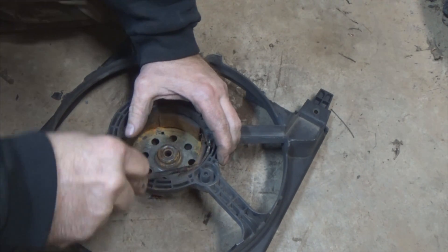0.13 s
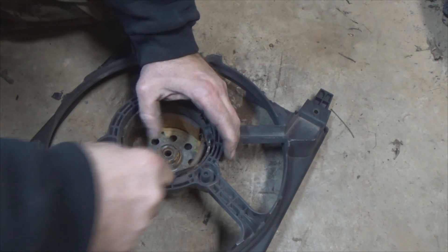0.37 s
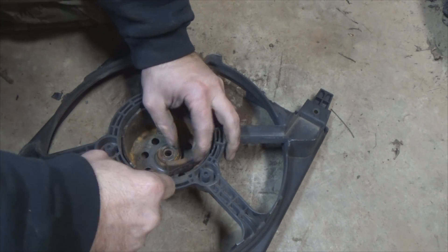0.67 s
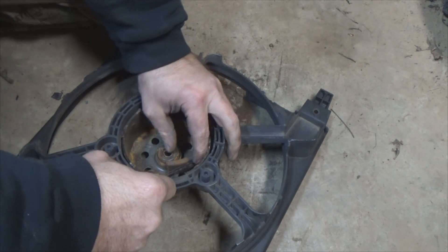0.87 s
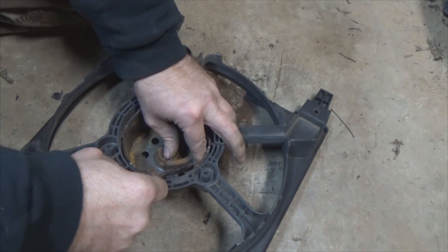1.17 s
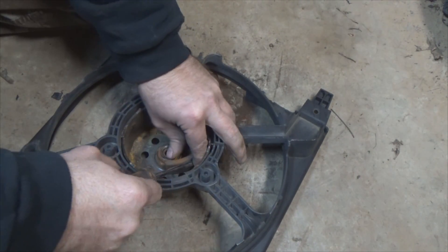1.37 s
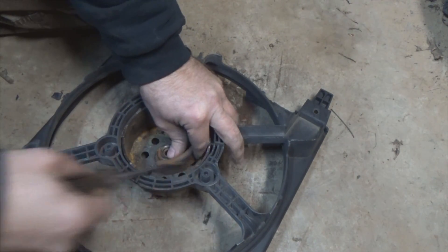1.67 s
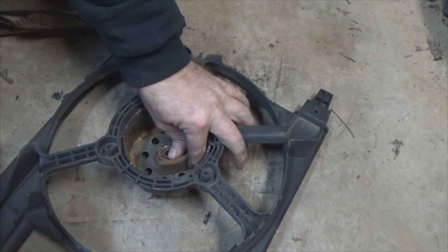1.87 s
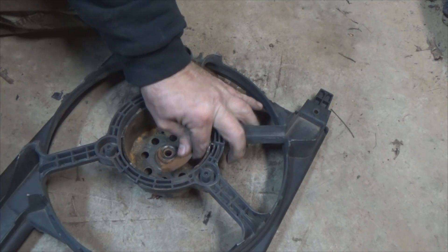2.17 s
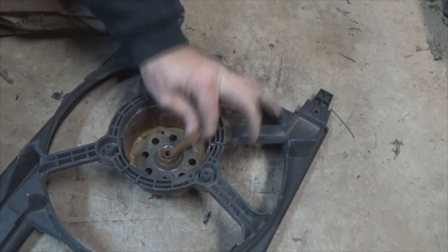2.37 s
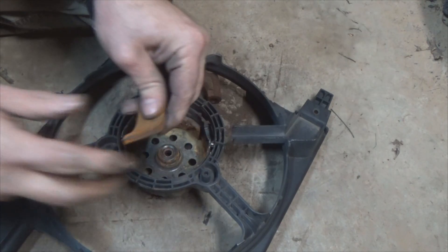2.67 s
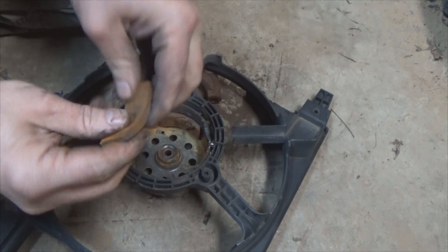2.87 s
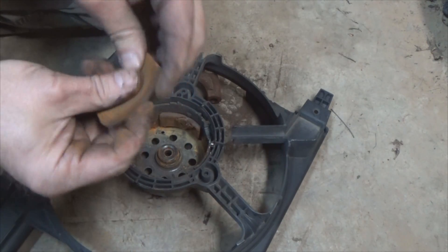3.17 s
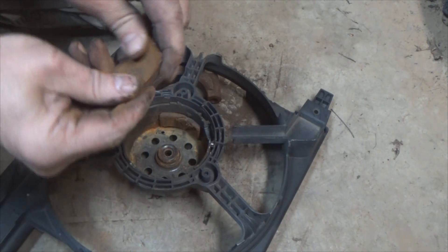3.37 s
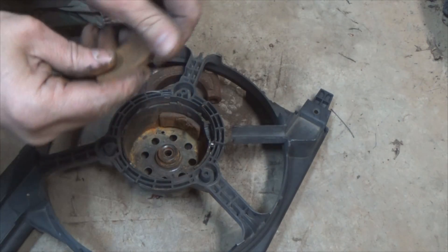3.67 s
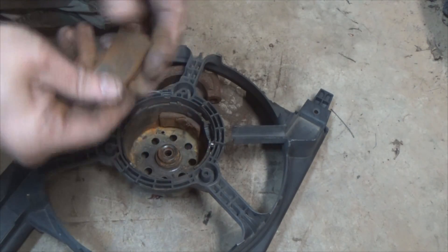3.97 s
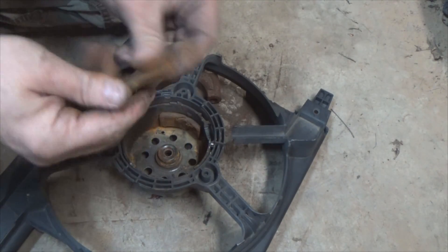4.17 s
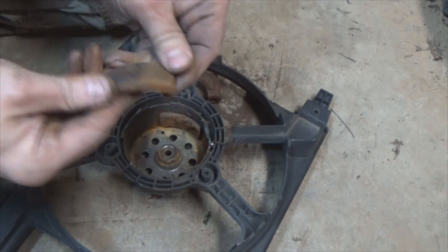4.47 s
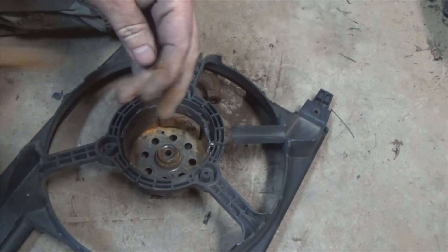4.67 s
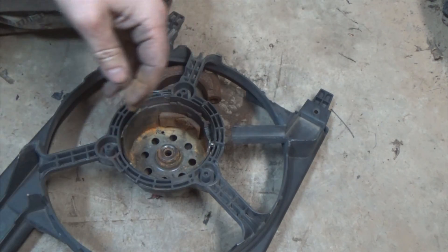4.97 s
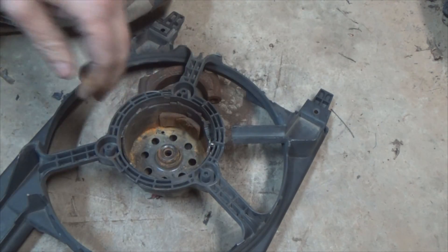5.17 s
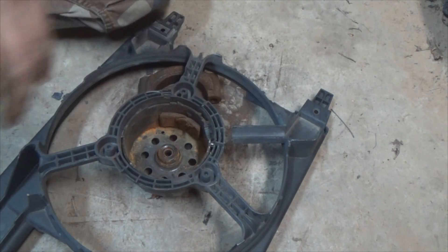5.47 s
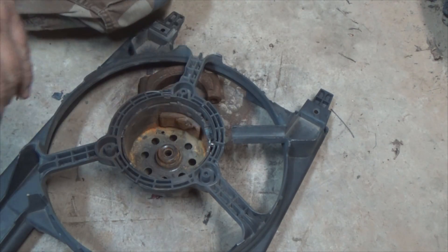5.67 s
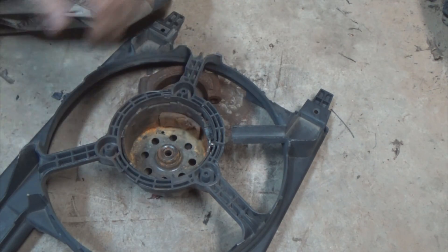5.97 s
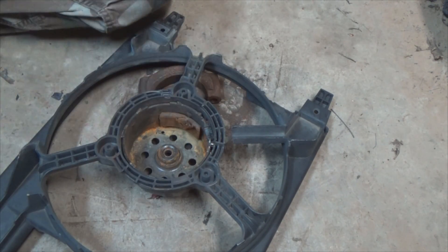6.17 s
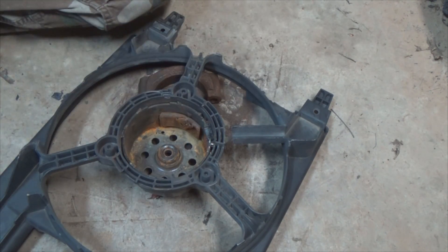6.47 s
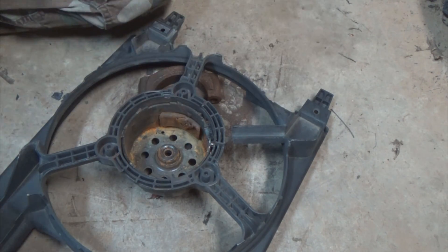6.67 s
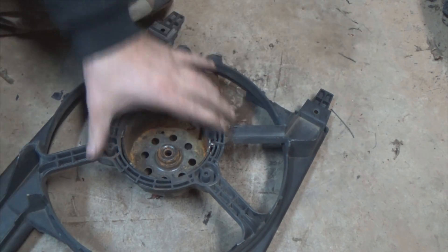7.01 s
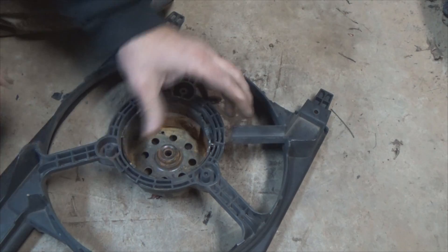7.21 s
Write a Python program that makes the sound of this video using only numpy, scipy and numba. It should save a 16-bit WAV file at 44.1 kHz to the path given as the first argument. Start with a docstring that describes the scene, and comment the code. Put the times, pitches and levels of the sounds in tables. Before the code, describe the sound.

Close up in a small workshop, a thin steel tool clatters and grates in a rusty motor shell, with short squeaks. A loosened magnet clacks free, dry fingertips hiss over it, a hand swishes on cloth, then the thrown magnet smashes noisily into a steel locker. Its panels ring on briefly over faint room hum, ending with light plastic taps.

```python
"""A thin steel tool pries a fastener and curved magnets from a motor shell in a plastic fan frame.
Each click is a burst of noise plus ringing modes; scrapes are rough noise through shell modes, squeals are overtones.
Magnets clack, and a thrown one crashes into a steel locker: fading noise bands and lone tones that ring on.
Dry fingers and a hand on trousers are shaped hiss. A small workshop adds echo, room tone, hum and a camera whine.
A close microphone with a fast limiter hears it all."""
import sys
import numpy as np
from scipy import signal
from scipy.fft import rfft, irfft
from scipy.io import wavfile
from scipy.ndimage import map_coordinates
from numba import njit

SR = 44100
rng = np.random.default_rng(int(sys.argv[2]) if len(sys.argv) > 2 else 0)


def waveform_to_disk(signal):
    """Save audio, clipped to [-1, 1], as 16-bit WAV at the path in sys.argv[1]."""
    frames = np.transpose(np.atleast_2d(signal))
    scaled = np.clip(frames, -1, 1) * 32767
    samples = np.round(scaled).astype(np.int16)
    wavfile.write(sys.argv[1], SR, samples)


N = 323865
TIME = np.arange(N) / SR
THIRDS_HZ = 50 * 2 ** (np.arange(26) / 3)

# Edges of the five bands of a contact (thud, body, clank, edge, sizzle): edge_hz
BAND_EDGES_HZ = [175, 600, 1700, 3000, 7000, 13500]
# Blows, with levels before each layer's gain:
# start_s, level_db, brightness_db_per_octave, clank_db (of a square hit), contact_decay_ms
TOOL_CLICKS = [(0.035, -8, -3.5, 9, 4.4), (0.054, -12.5, -2.5, 12, 1.4), (0.072, -12.5, -5.0, 9, 2.5),
               (0.135, -10, 1.5, 15, 1.5), (0.233, -29, 1.5, 0, 1.5), (0.246, -33, 1.5, -10.5, 1.8),
               (0.265, -17, 1, -4.5, 1.1), (0.274, -23.5, 2.0, 2, 0.76), (0.286, -35, 4.5, -10, 3.8),
               (0.474, -19, 1.5, -5, 0.61), (0.479, -20.5, 2.5, 2, 1.0), (0.532, -21, -2, -3.0, 1.6),
               (0.539, -22, 1.5, 9.0, 1.8), (0.545, -15.5, 0.5, 18, 1.7), (0.579, -25, 0, 19, 2.9),
               (0.697, -30.5, 1, -17, 3.7), (0.711, -21, -4.5, -24, 2.6), (1.342, -47.5, 3, -21, 1.8),
               (1.397, -45.5, 1.5, 9, 5.6), (1.434, -46.5, -0.5, 12.5, 11), (1.487, -35.5, -2.5, -11, 1.8),
               (1.647, -33, -1.5, -1, 4.8), (1.858, -19, 1.5, 8, 3.3), (2.008, -37.5, -4, 5, 6),
               (2.088, -25, -1, -12, 6.1), (2.431, -26, -1, -14, 3.4), (2.479, -18, 1, -7, 4.4)]
SHELL_KNOCKS = [(0.009, -11.5, 0.5, -11.5, 5.9), (0.456, -29, -0.5, -10, 15), (0.467, -21.5, -1.5, 2, 1.1),
                (0.562, -39.5, 6, 15, 2.4), (0.646, -23, -1.0, -11.0, 4.5), (0.661, -31, -6.5, 1, 3.3),
                (0.806, -41.5, 1, -0.5, 3.0), (1.156, -39.5, 0, -4, 7.2), (1.198, -46, -5, -4, 6),
                (1.691, -33.5, -2.0, -9, 3.3), (2.138, -24.5, 2.5, 3.5, 8.1), (2.144, -24.5, -2.0, 6, 3.3),
                (2.178, -35, 0.5, -6, 2.3), (2.221, -46.5, 6, 2, 3.3), (2.283, -24.5, 9.5, 15, 4.5)]
MAGNET_CLACKS = [(2.602, -36, -10, 17, 1), (2.754, -17.5, 4, -6, 2.3), (2.787, -28, 6.5, 8.5, 2.5),
                 (2.807, -30.0, 1, -12.0, 4.7), (2.956, -15, 1, -4.5, 2.1), (4.862, -45.5, -2.5, -2.0, 1.2),
                 (4.996, -51, -2, 4, 1)]
FRAME_BUMPS = [(0.833, -50, -6.0, -17, 19), (0.85, -44.5, 1, -16, 34), (0.897, -46.5, 0.5, -4.0, 28),
               (1.549, -42.5, -1.5, 4, 4.2), (2.598, -40, -4, 3, 0.52), (2.75, -44, -3.5, -23, 9.6),
               (2.836, -45.5, -1.5, -25, 7), (2.938, -50, -3.5, -12, 2.4), (2.992, -40, -0.5, 17, 0.73),
               (3.011, -40.5, -1, 6, 0.55), (7.178, -33.5, 2.5, 15.5, 1.3), (7.2, -49, 5.5, 10, 5.4),
               (7.235, -42.5, 2, -4.5, 9.3)]
# Strokes over rusty steel, before the layer's gain:
# start_s, end_s, level_db, brightness_db_per_octave, swell_db (from start to end)
SCRAPES = [(0.009, 0.072, -25, -3.5, 6.0), (0.066, 0.139, -24.5, -4, -6.5), (0.139, 0.224, -37.5, 0.5, -18),
           (0.487, 0.513, -36, -1.5, 8), (0.516, 0.536, -26, 1, 20), (0.558, 0.614, -29, -1.5, -10.5),
           (0.612, 0.661, -34.5, -2.5, 15), (0.677, 0.726, -44.5, -1, -1.5), (1.622, 1.687, -45, 1.5, 18),
           (1.71, 1.777, -37.0, 0.0, 20.5), (1.789, 1.817, -29.5, 2.5, 8), (1.824, 1.857, -37.5, -1, 3),
           (1.871, 1.942, -35.5, 0, -20), (2.072, 2.084, -45.5, 0.5, 15), (2.124, 2.136, -39, 2.5, 37),
           (2.162, 2.217, -55, 1, 4), (2.226, 2.277, -44, 0.5, 12), (2.295, 2.327, -32, 1.0, -7.5),
           (2.332, 2.386, -41, 1.5, -11), (2.379, 2.437, -42, 6.5, 1), (2.435, 2.481, -40.5, 1.0, 18)]
# Stick-slip locking into a tone:
# start_s, end_s, first_pitch_hz, last_pitch_hz, level_db, slope_db_per_overtone, pitch_jitter_share
SQUEALS = [(0.142, 0.187, 5800, 6920, -28.5, -20, 0.067), (0.867, 0.901, 287, 235, -48.5, -19, 0.038),
           (1.779, 1.815, 4780, 4610, -25, -9, 0.038), (1.808, 1.82, 8800, 8600, -27, -20, .01),
           (1.816, 1.827, 6780, 6480, -28, -15, .01), (2.125, 2.13, 2400, 2330, -34, 0, 0.018),
           (2.188, 2.28, 5870, 6030, -57, -20, .012), (2.293, 2.328, 2280, 2264, -30, 0.5, 0.057),
           (2.378, 2.398, 2143, 2190, -33.5, -2, 0.0081), (2.391, 2.432, 2081, 2010, -22.5, 1, 0.011),
           (2.43, 2.438, 2210, 2330, -21, 3, 0.011), (2.558, 2.576, 2200, 2150, -47.5, -17, .01),
           (7.227, 7.25, 850, 680, -48, -14, .04)]
# What each thing rings with, before small random shifts and band balancing: pitch_hz, width_hz, level_db
TOOL_MODES = [(5964, 196, 6.5), (6620, 110, -9), (7300, 50, -9.5), (8180, 220, 8), (8950, 120, 2),
              (9660, 190, 5.5), (10450, 71, -3), (12300, 33, -18)]
SHELL_MODES = [(865, 41, -4), (1130, 126, 2), (1487, 90, -2), (2062, 130, 4.5), (2365, 79, 0),
               (2590, 180, -3), (5010, 48, -14), (5580, 48, -24), (5650, 210, -0.5), (6590, 350, -4),
               (7600, 180, -12), (7630, 160, -7.5), (8620, 200, -4), (8690, 115, -1), (9485, 120, 2)]
MAGNET_MODES = [(2080, 100, 8.5), (3800, 140, -8.5), (5880, 180, -1.5), (6200, 220, -16), (6900, 240, -13),
                (7700, 97, -10), (8940, 75, -7)]
FRAME_MODES = [(337, 76, 0.5), (795, 19, -11.5), (885, 53, -1.5), (1174, 120, 9.5), (1610, 130, 7),
               (2086, 130, -4), (4450, 110, -11.5)]
# Usual colour of a contact on each thing: level_db in each of the five bands
TOOL_COLOUR = [-26, -18.5, -18.5, -5, 0.5]
SHELL_COLOUR = [-17, -2.5, 1.5, -3, -8.5]
MAGNET_COLOUR = [-25.5, -12.5, -5.5, -0.5, -19]
FRAME_COLOUR = [-4, 0, -13, -12, -11]
RUST_COLOUR = [-17, -5.5, -3.5, 0, 0.5]
# Magnet and its pieces hitting the locker: start_s, level_db, emphasised_hz, emphasis_db
LOCKER_BLOWS = [(5.815, -3.5, 1300, 3), (5.824, -5, 4530, 13), (5.845, 4, 4460, 6), (5.879, 5, 11400, 11.5),
                (5.923, 2.5, 387, 8), (5.948, -8.5, 1500, -14)]
# Dense modes of the sheet steel: band_hz, level_db (per third octave), fade_by_60_db_s
LOCKER_SHEET = [(60, -80, 1.6), (113, -51, 2), (226, -53, 1.97), (480, -44.5, 1.07), (885, -37, 0.78),
                (2080, -29, 0.43), (4020, -28, 0.28), (6650, -27, 0.23), (9500, -24.5, 0.22),
                (12500, -39, 0.19), (16000, -59, 0.14)]
# Lone panel modes, before their shared gain: pitch_hz, level_db, fade_by_60_db_s
LOCKER_MODES = [(120, -54, 1.2), (165.4, -44, 1.8), (217, -32, 1.57), (278, -36, 0.8), (357.7, -42, 5.3),
                (400, -40.5, 1.74), (588, -16.5, 0.29), (681, -20.5, 0.4), (862, -51, 2.67),
                (869, -15.5, 0.26), (1023, -45, 1.4), (1250, -53, 0.7), (1400, -36.5, 0.96),
                (1424, -43, 0.78), (1670, -51, 1.51), (1920, -40.5, 0.93)]
# Dry fingertips sliding over magnet and steel, before the gains: fastest_s, level_db, rise_s, fall_s
FINGER_SLIDES = [(1.02, -58.5, .04, 0.044), (1.13, -53, 0.049, 0.045), (1.25, -54.5, 0.048, 0.074),
                 (1.47, -60, 0.07, .08), (1.98, -51.5, 0.044, 0.11), (2.645, -55, .02, 0.029),
                 (2.8, -43.5, 0.058, 0.21), (3.02, -50, 0.07, 0.18), (3.21, -39.5, 0.07, .015),
                 (3.3, -38, 0.046, 0.058), (3.43, -41.5, 0.087, 0.18), (3.7, -37, 0.04, 0.042),
                 (3.78, -36, 0.039, 0.053), (3.962, -32.5, 0.033, .02), (4.09, -45, 0.077, 0.21),
                 (4.378, -36, 0.015, 0.027), (4.43, -46, .04, 0.065), (4.62, -44, 0.093, 0.12),
                 (4.73, -38.5, 0.034, 0.011), (5.1, -65.5, 0.63, 0.58)]
# Hand and sleeve brushing over cloth, before the gain: fastest_s, level_db, rise_s, fall_s
CLOTH_BRUSHES = [(5.465, -54, 0.011, 0.036), (5.537, -48, 0.016, 0.027), (6.47, -46, 0.12, 0.11),
                 (6.615, -43, 0.096, 0.038), (6.96, -62.5, 0.14, .13), (7.165, -49, 0.013, 0.012)]
# Relative spectra of the two finger hisses, the cloth and the room: pitch_hz, level_db (per Hz)
SKIN_HIGH = [(4000, -28.5), (6500, -11), (8000, -4.5), (9700, 1), (11500, -10), (13500, -16), (16000, -23)]
SKIN_LOW = [(300, -33), (1000, -9), (2800, -8.5), (4500, 3), (6500, 0.5), (8500, -19), (12000, -39)]
CLOTH_TONE = [(880, -46), (1500, -6), (1540, -21.5), (1670, -13), (2230, -11), (4210, -6), (5780, -8.5),
              (8250, -1), (15000, -19)]
FLOOR_TONE = [(12, -50), (20, -8), (86, -4.5), (116, -6), (150, -14.5), (177, -4.5), (210, -14),
              (377, -16.5), (1120, -19), (1330, -17), (2260, -23), (2460, -22), (3070, -26), (4060, -26.5),
              (16000, -34)]
# Workshop echo, before the wet gain: band_hz, level_db (per third octave), fade_by_60_db_s
ROOM = [(150, -26, 0.44), (504, -26.5, 0.11), (1520, -24, 0.22), (4050, -30, 0.19), (8050, -28.5, 0.19),
        (14000, -57, 0.29)]
# Wavering hum: pitch_hz, level_db (middle of its waver)
HUM = [(116, -60.5), (1310, -69)]


def tool_clicks():
    """The thin steel tool rings high and briefly when it hits."""
    return blows(TOOL_CLICKS, TOOL_MODES, TOOL_COLOUR,
                 attack_s=0.00059, ring_db=-5.5, tail_db=-32, tail_s=0.031, gain_db=-6)


def shell_knocks():
    """The motor shell rings lower, with a longer faint rattle."""
    return blows(SHELL_KNOCKS, SHELL_MODES, SHELL_COLOUR,
                 attack_s=0.00068, ring_db=-4, tail_db=-29.5, tail_s=0.13, gain_db=-4)


def scrapes(slip_rate, spread_db, ring_db, edge_s, fade_s, gain_db):
    """Irregular slips of the tool over rust drive the modes of the shell, which wander as the tip moves."""
    out = np.zeros(N)
    for start, end, level_db, brightness_db, swell_db in SCRAPES:
        length = max(end - start, edge_s)
        t = TIME[:int((length + .06) * SR)]
        onset = np.minimum(t / edge_s, 1)
        swell = amp(swell_db * np.minimum(t / length, 1))
        release = np.exp(-np.maximum(t - length, 0) / fade_s)
        slips = grit(slip_rate, spread_db, size=SR // 2)[:len(t)] * onset * swell * release
        body = signal.fftconvolve(slips, ring(SHELL_MODES))[:len(t)]
        # Reading the ring slightly early or late makes its pitch wander
        drift_s = np.cumsum(.015 * walk(50, size=SR // 2)[:len(t)]) / SR
        body = map_coordinates(body, [(t + drift_s) * SR], order=3)
        scrape = unit(slips) + amp(ring_db) * unit(body)
        add(out, start, weigh(scrape, RUST_COLOUR, level_db, brightness_db, 0, size=int(length * SR)))
    return out * amp(gain_db)


def squeals(flutter_db, rough_jitter, edge_s):
    """The slips turn periodic: a stack of overtones whose level flutters more when the pitch is rougher."""
    out = np.zeros(N)
    for start, end, first_hz, last_hz, level_db, slope_db, jitter in SQUEALS:
        t = TIME[:int(max(end - start, edge_s) * SR)]
        waver, flutter = (walk(rate, size=SR // 4)[:len(t)] for rate in (900, 400))
        hz = np.linspace(first_hz, last_hz, len(t)) * (1 + jitter * waver)
        phase = 2 * np.pi * np.cumsum(hz) / SR
        tone = sum(amp(slope_db * k) * np.sin(k * phase + k * k)
                   for k in range(1, 6) if k * first_hz < 11000)
        roughness = min(abs(jitter) / rough_jitter, 1)
        edges = np.minimum(np.minimum(t, t[::-1]) / edge_s, 1)
        add(out, start, amp(level_db) * unit(tone * amp(flutter_db * roughness * flutter) * edges))
    return out


def magnet_clacks():
    """The magnets ring clearly after a very sharp contact."""
    return blows(MAGNET_CLACKS, MAGNET_MODES, MAGNET_COLOUR,
                 attack_s=.00015, ring_db=0.5, tail_db=-26, tail_s=0.022, gain_db=-5.5)


def locker(side_db, pan_db, build_cycles, emphasis_octaves, modes_db, ring_start, ring_end, end_s):
    """Blows set the thin panels shimmering; low bands build slowly, and lone panel modes ring on."""
    t = TIME[:2 * SR]
    start = LOCKER_BLOWS[0][0]
    crash = np.zeros((2, len(t)))
    for hz, noise in zip(THIRDS_HZ, diffuse(len(t))):
        sheet_db, t60 = at_hz(hz, LOCKER_SHEET)
        power = np.zeros(len(t))
        for s, blow_db, peak_hz, peak_db in LOCKER_BLOWS:
            age = np.maximum(t - (s - start), 0)
            emphasis_db = peak_db * np.exp(-(np.log2(hz / peak_hz) / emphasis_octaves) ** 2)
            build = 1 - np.exp(-age * hz / build_cycles)
            power += (amp(sheet_db + blow_db + emphasis_db - 60 * age / t60) * build) ** 2
        # Each group of modes beats on its own
        crash += noise * np.sqrt(power) * amp(0.82 * walk(150, size=len(t)))
    crash *= amp(0.26 * walk(450, size=len(t)))  # the loose door chatters
    panels = sum(amp(db + modes_db - 60 * t / t60) * np.sin(2 * np.pi * (hz * t + rng.random((2, 1))))
                 for hz, db, t60 in LOCKER_MODES)
    out = np.zeros((2, N))
    add(out, start, crash)
    add(out, ring_start, panels * (1 - np.exp(-t / 0.08)))
    out = out * np.exp(-np.maximum(TIME - ring_end, 0) / end_s)  # the last of the ring dies away quickly
    # Left and right differ mainly between the bass and the top
    mid, side = out[0], amp(side_db) * band(out[1], 490, 9200)
    return place(np.array([mid + side, mid - side]), pan_db)


def fingers(high_db, low_db):
    """Fine-grained hiss of dry fingertips sliding on the parts; louder slides are brighter."""
    high = colour(grit(830, 1.6), SKIN_HIGH)
    low = colour(grit(700, 1.7), SKIN_LOW)
    gain = strokes(FINGER_SLIDES)
    # Above this level the lower hiss grows only 0.69 dB per dB of the upper one
    even = amp(-57)
    lower_gain = np.minimum(gain, even * (gain / even) ** 0.69)
    hiss = amp(high_db) * gain * high + amp(low_db) * lower_gain * low
    return hiss * amp(1.37 * walk(60))


def cloth(gain_db):
    """Soft swishes of hand and sleeve on trousers: shaped noise that swells and fades."""
    return amp(gain_db) * strokes(CLOTH_BRUSHES) * colour(grit(240, 0.86), CLOTH_TONE)


def frame_bumps():
    """The plastic frame answers a touch with low, damped modes."""
    return blows(FRAME_BUMPS, FRAME_MODES, FRAME_COLOUR,
                 attack_s=0.00045, ring_db=-4.5, tail_db=-20.5, tail_s=0.028, gain_db=-2.5)


def workshop(x, wet_db, side_db, gap_s):
    """Short diffuse echo of floor, walls and shelves: noise bands that fade at their own speeds."""
    t = TIME[:SR // 2]
    response = 0
    for hz, noise in zip(THIRDS_HZ, diffuse(len(t))):
        level_db, t60 = at_hz(hz, ROOM)
        tail = noise * amp(-60 * t / t60) * np.clip(t / gap_s - 1, 0, 1)
        # The last factor makes up for the greater width of higher bands
        response = response + amp(level_db) * unit(tail) / np.sqrt(len(t)) * np.sqrt(hz / 1000)
    echo = signal.fftconvolve(x[None], response, axes=1)[:, :N]
    mid, side = echo * amp([[wet_db], [wet_db + side_db]])
    return np.array([mid + side, mid - side])


def camera_whine(hz, peak_db, pip_s):
    """The camera gives off a faint, uneven pip once every picture."""
    pictures_per_s = 29.97
    offset = ((TIME - 5.757) * pictures_per_s + .5) % 1 - .5  # in pictures, from the nearest pip
    pips = np.exp(-(offset / pictures_per_s / pip_s) ** 2) * amp(peak_db + 2 * walk(30))
    return pips * np.sin(2 * np.pi * hz * TIME + walk(200))


def room_tone(floor_db, side_db):
    """Rumble and hiss from shaped noise, and a hum that wavers in level and phase."""
    mid, side = (colour(rng.standard_normal(N), FLOOR_TONE) for _ in range(2))
    side = amp(side_db) * band(side, 270, 9900)
    hum = sum(amp(db + 1.8 * walk(5.0)) * np.sin(2 * np.pi * hz * TIME + 2.3 * walk(8.9)) for hz, db in HUM)
    return amp(floor_db) * np.array([mid + side, mid - side]) + hum


def blows(table, modes, tone_db, attack_s, ring_db, tail_db, tail_s, gain_db):
    """Each blow is a brief crack, the modes of the struck body and a faint rattle of what touches it."""
    out = np.zeros(N)
    for start, level_db, brightness_db, clank_db, contact_ms in table:
        body = ring(modes)
        t = TIME[:len(body)]
        envelope = np.exp(-1000 * t / contact_ms) + amp(tail_db) * np.exp(-t / tail_s)
        noise = envelope * rng.standard_normal(len(t))
        hit = (noise + amp(ring_db) * body) * (1 - np.exp(-t / attack_s))
        add(out, start, weigh(hit, tone_db, level_db, brightness_db, clank_db, size=265))
    return out * amp(gain_db)


def ring(modes, size=6000):
    """Free decay of a struck body; contact point and grip change each mode's strength and shift it a little."""
    shift, spread_db = .01, 3
    t = TIME[:size]
    out = 0
    for hz, width, db in modes:
        detune, phase, strength = rng.standard_normal(3)
        decay = np.exp(-np.pi * abs(width) * t)
        tone = np.sin(2 * np.pi * (hz * (1 + shift * detune) * t + phase))
        out = out + amp(db + spread_db * strength) * decay * tone
    return out


def weigh(x, tone_db, level_db, brightness_db, clank_db, size):
    """Set a contact's level and colour by its first samples: hardness tilts it, a square hit adds clank."""
    # A contact of finite length holds little top
    x = signal.sosfilt(signal.butter(2, 12500, fs=SR, output="sos"), x)
    pivot_hz, clank_hz, clank_octaves = 2000, 2200, 2.23
    out = 0
    for lo, hi, db in zip(BAND_EDGES_HZ, BAND_EDGES_HZ[1:], tone_db):
        part, hz = band(x, lo, hi), np.sqrt(lo * hi)
        tilt = brightness_db * np.log2(hz / pivot_hz)
        clank = clank_db * max(1 - abs(np.log2(hz / clank_hz)) / clank_octaves, 0)
        out = out + part * amp(level_db + db + tilt + clank) / np.std(part[:size])
    return out


def strokes(table):
    """Level of rubbing movements: each speeds up to a peak and slows down again along a bell curve."""
    power = 1e-18
    for peak_s, level_db, rise_s, fall_s in table:
        width_s = np.where(TIME < peak_s, rise_s, fall_s)
        power = power + amp(level_db) ** 2 * np.exp(-((TIME - peak_s) / width_s) ** 2 * 2)
    return np.sqrt(power)


def walk(rate, size=N):
    """Smooth chance with a spread near 1, taking a new random value rate times a second."""
    points = rng.standard_normal(size)
    return np.interp(np.arange(size) / SR * rate, np.arange(size), points) * np.sqrt(1.5)


def grit(rate, spread_db, size=N):
    """Noise broken up by tiny bumps of uneven size."""
    return unit(rng.standard_normal(size) * amp(spread_db * walk(rate, size)))


def diffuse(size):
    """Third-octave bands of noise, each with rms 1, different left and right: bands x 2 x samples."""
    noise = rng.standard_normal((2, size))
    return np.array([unit(band(noise, hz / 2 ** (1 / 6), hz * 2 ** (1 / 6))) for hz in THIRDS_HZ])


def colour(x, spectrum):
    """Give a signal a spectrum; rms 1."""
    gain_db = at_hz(np.fft.rfftfreq(N, 1 / SR), spectrum)[0]
    return unit(irfft(rfft(x) * amp(gain_db), N))


def at_hz(hz, table):
    """Read the columns of a table on a log-frequency axis."""
    points, *columns = np.transpose(table)
    return [np.interp(np.log(hz + 1e-9), np.log(points), c) for c in columns]


def band(x, lo_hz, hi_hz):
    """Keep only the sound between two frequencies."""
    return signal.sosfilt(signal.butter(4, [lo_hz, min(hi_hz, SR / 2 - 1)], "band", fs=SR, output="sos"), x)


def amp(db):
    """Decibels to gain."""
    return 10 ** (np.asarray(db) / 20)


def unit(x):
    """Scale to rms 1."""
    return x / np.sqrt(np.mean(x ** 2) + 1e-20)


def add(track, start, sound):
    """Mix a sound into a track at a time in seconds."""
    i = max(int(start * SR), 0)
    track[..., i:i + sound.shape[-1]] += sound[..., :N - i]


def place(x, pan_db):
    """Set a sound between left and right by their level difference; above zero is left."""
    return x * amp(np.array([[pan_db], [-pan_db]]) / 2)


def scene():
    """Handwork near the centre and magnets to the left, both with echo; then the locker and background."""
    work = tool_clicks() + shell_knocks() + frame_bumps()
    work += scrapes(slip_rate=469, spread_db=1.5, ring_db=6.5, edge_s=0.0029, fade_s=0.0099, gain_db=-2.5)
    work += squeals(flutter_db=2.5, rough_jitter=.035, edge_s=0.0013)
    work += fingers(high_db=0.5, low_db=-3.5) + cloth(gain_db=0.5)
    magnets = magnet_clacks()
    mix = place(work, pan_db=0.9) + place(magnets, pan_db=4)
    mix += locker(side_db=-7.5, pan_db=1.0, build_cycles=1.5, emphasis_octaves=0.36, modes_db=2.5,
                  ring_start=5.92, ring_end=7.17, end_s=0.075)
    mix += workshop(work + magnets, wet_db=-5.0, side_db=-4.5, gap_s=0.00091)
    mix += camera_whine(hz=3110, peak_db=-60, pip_s=0.0037)
    return mix + room_tone(floor_db=-55, side_db=-5.0)


@njit
def follow(x, attack, release):
    """Envelope that rises fast and falls more slowly."""
    out, e = np.empty(len(x)), 0.
    for i in range(len(x)):
        e += (x[i] - e) * (attack if x[i] > e else release)
        out[i] = e
    return out


def record(dry):
    """A fast limiter holds the loud blows down, the peaks are rounded and the top is cut."""
    ceiling, attack_s, release_s, top_hz = 0.29, 0.00014, 0.0069, 15900
    attack, release = (1 - np.exp(-1 / (s * SR)) for s in (attack_s, release_s))
    envelope = follow(np.abs(dry).max(axis=0), attack, release)
    held = np.tanh(dry * ceiling / np.maximum(envelope, ceiling))
    return signal.sosfilt(signal.ellip(8, .2, 70, top_hz, fs=SR, output="sos"), held)


dry = scene()
out = record(dry)
waveform_to_disk(out)
```